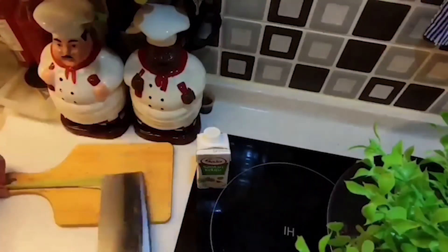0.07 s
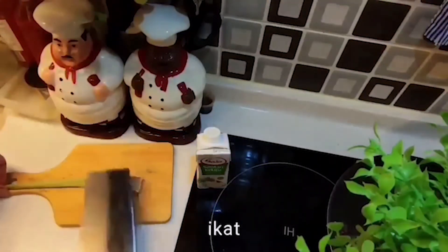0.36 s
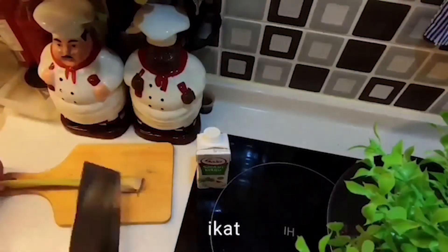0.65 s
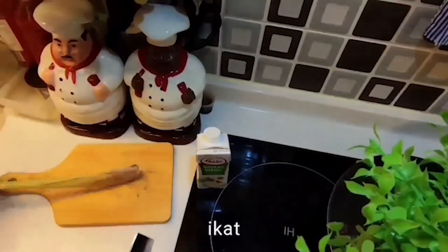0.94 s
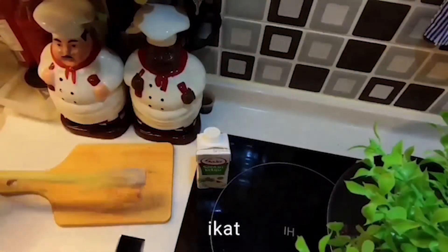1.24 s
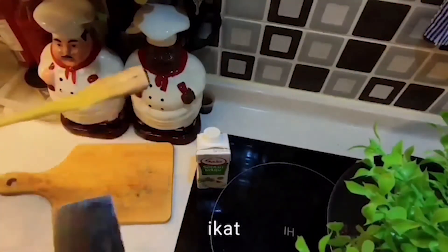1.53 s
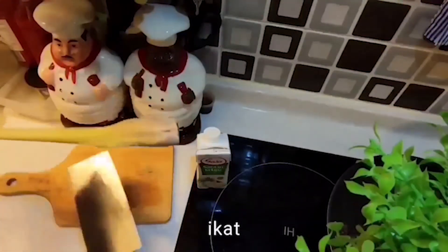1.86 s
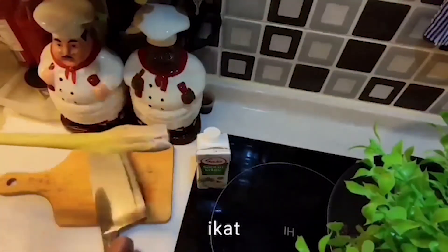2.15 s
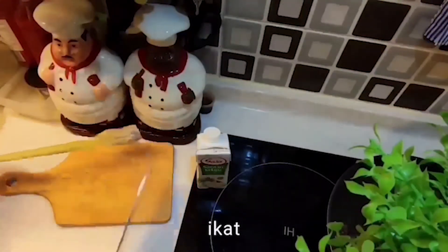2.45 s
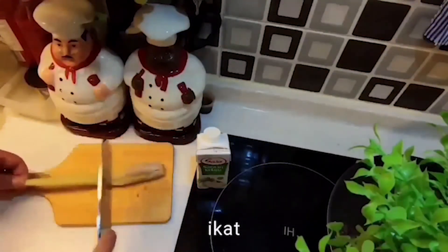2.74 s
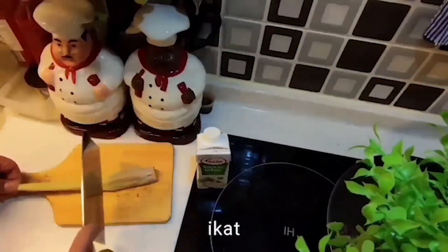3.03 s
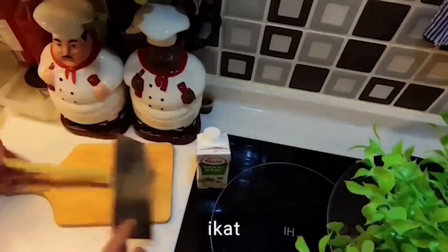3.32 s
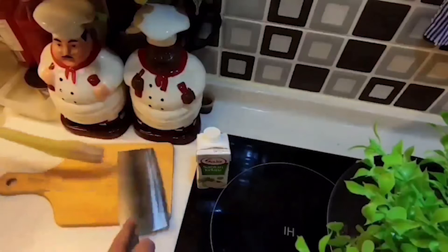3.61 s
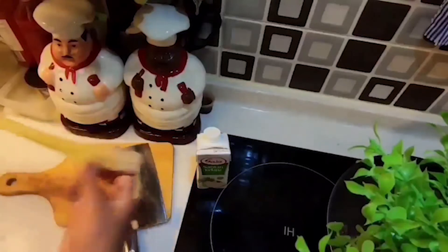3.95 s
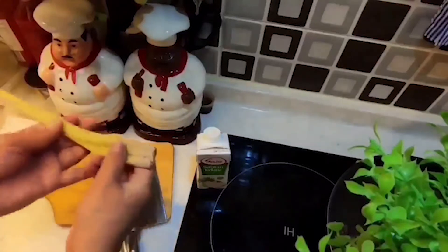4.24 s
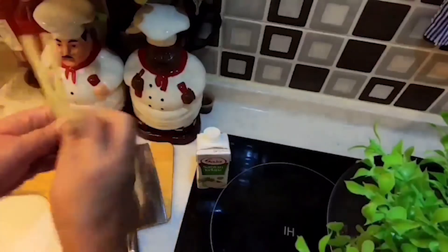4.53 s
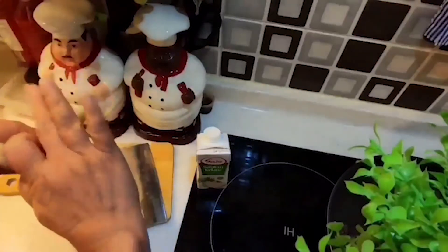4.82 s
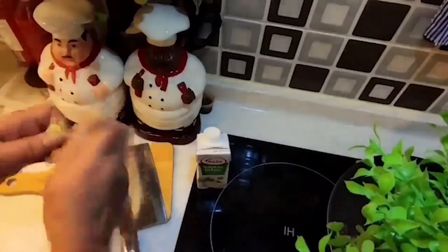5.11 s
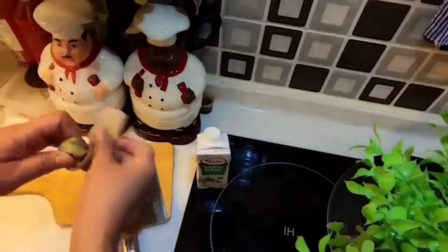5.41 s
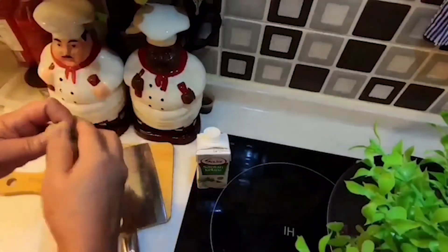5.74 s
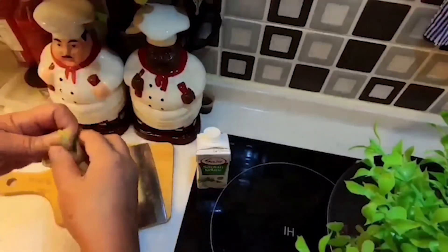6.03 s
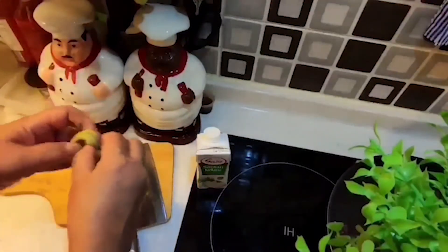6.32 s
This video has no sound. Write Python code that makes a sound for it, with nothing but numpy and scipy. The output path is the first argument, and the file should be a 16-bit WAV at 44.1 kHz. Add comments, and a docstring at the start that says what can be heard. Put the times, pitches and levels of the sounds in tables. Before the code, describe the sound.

In the first second, the flat of a cleaver smashes a lemongrass stalk four times, about a quarter second apart. Each blow is a crunch of bursting fibres with a steel clack and a thump of the wooden board. At 1.3 seconds the cleaver knocks loudly on the counter. Light taps and scrapes of the blade come around 2.5, 3.2 and 3.8 seconds, with some faint rubbing of fingers. At about 4 seconds the cleaver clatters down on the board, its steel ringing briefly as it rocks to rest. From then until about 6.6 seconds, fingers quietly rub and fold the stalk close to the microphone, and its fibres give small, scattered snaps. The knocks have a short, small kitchen echo. Moving air and an appliance motor hum faintly throughout, rising a little near 6 seconds.

```python
"""A small kitchen, where the flat of a cleaver smashes a lemongrass stalk again and again on a board.
Each blow bursts the fibres, thumps the wood and makes the counter boom. The cleaver then knocks on the
counter, is turned over and clatters down on the board, its steel ringing. Fingers rub and fold the stalk,
which crackles as its fibres snap. Moving air and an appliance motor hum faintly underneath."""
import sys
import numpy as np
from scipy import signal
from scipy.fft import rfft, irfft
from scipy.io import wavfile
from scipy.ndimage import uniform_filter1d, minimum_filter1d

SR = 44100
rng = np.random.default_rng(int(sys.argv[2]) if len(sys.argv) > 2 else 0)


def unload_wav(signal):
    """Save mono or channel-first audio to the path in sys.argv[1] as 16-bit WAV at rate SR, clipped to [-1, 1]."""
    wavfile.write(
        sys.argv[1],
        SR,
        np.round(np.clip(np.atleast_2d(signal).T, -1, 1) * 32767).astype(np.int16),
    )


N = 289737
T = np.arange(SR * 45 // 100) / SR  # time within one short sound, in seconds

# tone of breaking fibres: pitch_hz, level_db
CRUNCH_TONE = [(60, -25), (250, -20.5), (700, -3.5), (980, -3), (1250, -4.5), (1600, -5), (2200, -3.5),
               (3000, -5.5), (4000, -8.5), (6500, -10), (9000, -9), (13000, -11), (16000, -12.5)]
# notes of counter, board and cleaver, named in the lists of contacts and scrapes:
# pitch_hz, level_db, ring_s (time to fade by 60 dB)
COUNTER = [(51, -29.5, 0.47), (73.4, 5, 0.24), (101, 19.5, 0.088), (153.5, 15.5, 0.097), (208.8, -7, 0.45)]
BOARD_RIM = [(256, 14, 0.033), (324, 18, 0.047), (625, -19, .03)]
BOARD_SLAPPED = [(454, 1, 0.074), (516, -3.5, 0.066), (604, 2, 0.087), (763, -5, 0.08), (837, -7, 0.14),
                 (929, -4, 0.095), (970, -9, 0.1)]  # under the whole flat of the blade
BOARD_FREE = [(459, -1, 0.11), (497, 1, 0.1), (1590, -4.5, 0.022), (2030, -19, .02)]  # with nothing pressing on it
HANDLE_DOWN = [(199, 2, 0.08), (223, -4.5, 0.14), (327.4, -7, 0.12), (443, -1.5, 0.11), (566, -2, 0.081),
               (599.5, 1, 0.16), (694, -3, 0.051), (773, 2, 0.13), (998, -6.5, 0.1), (1640, -2, .03),
               (2094, -3.5, 0.023), (2440, 7.5, 0.019)]
BLADE_PING = [(3054, 0, .24), (3066, -12, .26), (8560, -13, .14)]
BLADE_ON_EDGE = [(1285, 17, 0.022), (2024, 17, 0.032), (2760, 16, 0.036), (3530, -4, 0.12), (5080, 2, 0.13),
                 (6300, -5, 0.17), (8400, -8, 0.1), (9560, -6, .08), (11000, -21, .1), (12400, -13, .12),
                 (13280, -9, .1)]
BLADE_LOOSE = [(1540, -3, 0.14), (1701, 1, 0.14), (1860, 1, 0.09), (2020, 1, 0.08), (2200, 0, .07),
               (2428, -5, .14), (2589, 1, 0.14), (3483, 4, 0.1), (3620, 10, 0.09), (4400, -3, .08),
               (4980, -7, .18), (5459, -2, 0.2), (5794, -5, 0.22), (6223, -10, .15), (7058, -8, .13),
               (7407, -12, .14), (8349, -3, 0.12), (8631, 9, 0.085), (9956, -5, 0.2), (9981, -4, .08),
               (11780, -4, 0.06), (13420, -12, 0.1), (15200, -3, .04)]
BLADE_ROCKING = [(5463, 0, .26), (5480, -9, .2), (5792, -13, .25), (9958, -12, .2)]  # the steel sings on as it rocks to rest
BLADE_SLIDING = [(8200, 3, 0.033), (8560, 17, 0.034), (8550, -4, .04), (9470, 2, 0.24), (12350, -19, .04)]
BLADE_SKIDDING = [(7350, 16, 0.037), (7540, -8, 0.028)]
BLADE_HELD = [(1450, -4, .025), (2650, -6, .02), (6255, -13, 0.14), (7440, -16, 0.25), (8107, -4, 0.12),
              (8570, -10, .1), (9000, -7, .04), (9313, -10, .08), (9604, -1, 0.11), (12330, -15, .1),
              (13070, -13, .07)]


def gain_of(db):
    """Turns decibels into a multiplier."""
    return 10 ** (np.asarray(db) / 20)


def unit_level(x):
    """Scales a sound to an average power of 1."""
    return x / np.sqrt(np.mean(x ** 2) + 1e-20)


def at_level(x, db):
    """Gives a short sound the energy of 10 ms at this level."""
    return gain_of(db) * x / np.sqrt(np.sum(x ** 2) * 100 / SR + 1e-20)


def at_pitch(points, hz):
    """Looks up a value between the rows of a table of pitches."""
    pitches, values = np.transpose(points)
    return np.interp(np.log(hz + 1), np.log(pitches + 1), values)


def curve(points):
    """Joins (time_s, value) points with straight lines."""
    return np.interp(np.arange(N) / SR, *np.transpose(points))


def add(mix, start_s, sound):
    """Mixes a sound in; what lies outside the mix is dropped."""
    start = round(start_s * SR)
    sound = sound[..., max(-start, 0):]
    part = mix[..., max(start, 0):][..., :sound.shape[-1]]
    part += sound[..., :part.shape[-1]]


def convolve(x, response):
    """Lets every sample of x set off the response."""
    return signal.fftconvolve(x, response)[:len(x)]


def colour(x, tone, tilt=0, size=4096):
    """Filters a sound to a tone table, plus a tilt in dB per octave."""
    hz = abs(np.fft.fftfreq(size, 1 / SR))
    log_gain = np.log(gain_of(at_pitch(tone, hz) + tilt * np.log2(hz / 2000 + .1)))
    spectrum = np.exp(np.conj(signal.hilbert(log_gain)))  # nothing rings before its cause
    return convolve(x, np.fft.ifft(spectrum).real[:size // 2])


def stereo_noise(count):
    """White noise at two close microphones: alike in the bass, unrelated in the treble."""
    # how alike the two sides are: pitch_hz, likeness (0 to 1)
    likeness = [(30, 1), (100, 0.68), (220, 0.92), (450, 0.66), (900, 0), (1800, 0), (16000, 0.078)]
    left, other = rfft(rng.standard_normal((2, count)))
    same = np.clip(at_pitch(likeness, np.fft.rfftfreq(count, 1 / SR)), -1, 1)
    right = same * left + np.sqrt(1 - same ** 2) * other
    return irfft(np.array([left, right]), count)


def crackle(peak_s, spread_db=-1.5):
    """A cluster of tiny, uneven clicks that swells to a peak and stops."""
    grains = rng.standard_normal(len(T)) * gain_of(spread_db * rng.standard_normal(len(T)))
    return grains * (T / peak_s) ** 2 * np.exp(-(T / peak_s) ** 2)


def ring(notes):
    """An object's own notes start together and fade, each at its own rate."""
    return sum(gain_of(db - 60 * T / ring_s) * np.sin(2 * np.pi * hz * T) for hz, db, ring_s in notes)


def strike(notes, db, contact_s):
    """The notes build up while the contact lasts, then ring out."""
    return at_level(ring(notes) * (1 - np.exp(-(T / contact_s) ** 2)), db)


def kitchen(x, room_db, near_ring_s=0.12, build_s=0.00098, lag_s=0.00015):
    """Direct sound and first echoes reach the left side first; scatter and the room's tail follow."""
    # echoes from counter, tiles and cupboards: delay_s, level_db
    echoes = [(.0064, -26), (.0086, -15), (0.0211, -10), (0.0242, -18)]
    # scatter from things nearby, and the room's tail: pitch_hz, level_db
    near_tone = [(80, 9.5), (450, -13.5), (1200, -4.5), (4000, 6), (9000, 3), (16000, -4.5)]
    tail_tone = [(80, -5.5), (450, -1.5), (1200, 0), (4000, -7.5), (9000, -11), (16000, -13)]
    # how long the tail lasts: pitch_hz, ring_s
    tail_times = [(80, 0.73), (450, 0.31), (2000, 0.36), (8000, 0.52), (16000, 0.38)]
    direct = np.zeros(len(T))
    direct[0] = 1
    for delay_s, db in echoes:
        add(direct, delay_s, gain_of([db + room_db]))
    hz, t, bands = signal.stft(stereo_noise(len(T)), SR, nperseg=256)
    hz = hz[:, None]
    fade = lambda ring_s: np.sqrt(np.log(1e6) / (ring_s * SR)) * gain_of(-60 * t / ring_s)
    near = gain_of(at_pitch(near_tone, hz)) * fade(near_ring_s)
    tail = gain_of(at_pitch(tail_tone, hz)) * fade(at_pitch(tail_times, hz))
    response = signal.istft(bands * (near + tail), SR, nperseg=256)[1][:, :len(T)]
    response *= (1 - np.exp(-T / build_s)) * gain_of(room_db)
    add(response[0], 0, direct)
    add(response[1], lag_s, direct)
    return np.array([convolve(x, side) for side in response])


def air_and_hum(air_db=-62, step_s=5.95, rise_s=0.084, step_db=6):
    """Moving air and a motor's slightly wavering hum; the background steps up near the end."""
    # the air's rush and the motor's notes: pitch_hz, level_db
    air_tone = [(15, -49), (25, -13), (55, -2), (114, -9.5), (130, -7), (185, 0.5), (217, -16.5),
                (394, -8.5), (560, -16.5), (936, -17), (1190, -28.5), (1400, -22.5), (1940, -30.5),
                (8590, -37.5), (16000, -38.5)]
    motor_notes = [(96.9, -78), (141.0, -67.5), (188.4, -75.5), (398.4, -80), (518, -79)]
    dip = [(7000, 0.0055), (8600, -6), (10800, 0.0029)]  # softer where the left microphone resonates
    air = np.array([colour(colour(side, air_tone), dip) for side in stereo_noise(N)])
    t = np.arange(N) / SR
    drifts = signal.resample(rng.standard_normal((len(motor_notes), 32)), N, axis=1)
    hum = sum(gain_of(db) * np.sqrt(2) * np.sin(2 * np.pi * hz * t + drift)
              for (hz, db), drift in zip(motor_notes, drifts))
    step_up = gain_of(curve([(step_s, 0), (step_s + rise_s, step_db)]))
    return (gain_of(air_db) * unit_level(air) + hum) * step_up


def finger_rubbing(catches_per_s=1500, slide=0.48, hold_db=-73.5, fold_db=-70, fold_from_s=4.1):
    """Skin slides over fibres: a steady hiss with tiny catches, swelling with each stroke."""
    # tone of the hiss: pitch_hz, level_db
    hiss_tone = [(300, -6.5), (1500, 2), (4000, 1), (7000, -0.5), (9000, -0.5), (12000, -2), (16000, -4.5)]
    # strokes along the stalk: start_s, length_s, level_db
    strokes = [(2.868, 0.38, -69.5), (3.825, 0.26, -64.5), (4.28, 0.12, -87), (4.85, 0.21, -69.5),
               (5.297, 0.28, -67.5), (5.426, 0.35, -65.5), (5.99, 0.24, -63), (6.226, 0.13, -65)]
    catches = (rng.random(N) < catches_per_s / SR) * gain_of(3 * np.minimum(rng.exponential(1, N), 4))
    hiss = np.array([colour(side * (slide + catches), hiss_tone) for side in stereo_noise(N)])
    power = gain_of(np.where(np.arange(N) / SR < fold_from_s, hold_db, fold_db)) ** 2
    for start_s, length_s, db in strokes:
        fastest_s = start_s + 0.038 * length_s
        power += gain_of(db) ** 2 * curve([(start_s, 0), (fastest_s, 1), (start_s + length_s, 0)])
    return unit_level(hiss) * np.sqrt(power)


def stalk_snaps(snaps_per_s=13, small_db=-70.5, spread_db=2):
    """Fibres snap one by one: a few loud ones, and small ones at random as the stalk bends."""
    # the loudest snaps: start_s, level_db
    loud_snaps = [(1.446, -61), (4.355, -63), (4.398, -61), (4.9525, -64), (5.054, -64.5), (5.0925, -60.5),
                  (5.6525, -65.5), (6.075, -63), (6.099, -60.5), (6.372, -65), (6.482, -64.5),
                  (6.551, -61.5)]
    # bends of the stalk: start_s, end_s (silent if the end comes first)
    bends = [(4.307, 4.6), (4.952, 5.2), (5.549, 5.79), (6.029, 4.2)]
    # tone of a snap: pitch_hz, level_db
    snap_tone = [(300, -14), (1500, -13), (4000, -11), (6500, -11), (8700, 0), (11000, -8), (16000, -13)]
    snaps, out = list(loud_snaps), np.zeros(N)
    for start_s, end_s in bends:
        for k, (place, size) in enumerate(rng.random((16, 2))):
            snap_s = start_s + (k + place) / snaps_per_s
            if snap_s < end_s:
                snaps.append((snap_s, small_db + spread_db * (2 * size - 1)))
    for snap_s, db in snaps:
        add(out, snap_s, at_level(colour(crackle(peak_s=0.0022), snap_tone), db))
    return out


def blade_scrapes(room_db=-2):
    """The blade scrapes over wood, and many tiny catches set it ringing."""
    # each scrape: start_s, level_db, peak_s, notes
    scrapes = [(0.601, -49, 0.0028, BLADE_SLIDING), (.614, -52, .008, BLADE_SKIDDING),
               (2.63, -54.5, 0.015, BLADE_HELD), (3.815, -59.5, 0.072, BLADE_SLIDING)]
    for start_s, db, peak_s, notes in scrapes:
        yield start_s, at_level(convolve(crackle(peak_s), ring(notes)), db), room_db


def cleaver_knocks(tick_gain=0.41, tick_s=0.0035, rise_s=0.00054, tilt_above_hz=615):
    """Steel and handle hit wood: a tick, then a short chatter. Hard knocks are bright, light ones thin."""
    # each knock: start_s, level_db, ring_s, lowest_hz, tilt_db_per_octave, room_db
    knocks = [(1.3, -27, 0.02, 153, -8, -1.5), (1.3004, -43.5, 0.03, 7500, 2.5, -1.5),
              (1.353, -34, 0.049, 239, -32, -12), (2.511, -45, 0.044, 85, -3, -4),
              (2.633, -56.5, 0.07, 139, 0, -10.5), (3.2267, -50, 0.02, 133, -4.5, -10),
              (3.827, -57, 0.011, 1310, -13.5, -2), (4.031, -26.5, 0.18, 570, -1.8, 0.5),
              (4.0315, -37, .05, 12900, 6, -13), (4.066, -41, 0.037, 1200, -1, -12),
              (4.135, -47.5, 0.04, 690, -3, -2), (4.2001, -48, 0.009, 88.5, -7.5, -16),
              (4.1995, -60, .005, 12000, 14, -18)]
    # tone of a knock: pitch_hz, level_db
    knock_tone = [(80, 4.5), (220, 2.5), (600, 4.5), (1300, -3), (3200, 0.5), (6000, -4), (9000, -8.5),
                  (14000, -10)]
    for start_s, db, ring_s, lowest_hz, tilt, room_db in knocks:
        fade = gain_of(-60 * T / ring_s) + tick_gain * np.exp(-T / tick_s)
        rise = 1 - np.exp(-T / rise_s)
        tone = [(hz, level + tilt * np.log2(max(hz / tilt_above_hz, 1))) for hz, level in knock_tone]
        chatter = colour(rng.standard_normal(len(T)) * fade * rise, tone)
        bass_cut = signal.butter(3, lowest_hz, "highpass", fs=SR, output="sos")
        yield start_s, at_level(signal.sosfilt(bass_cut, chatter), db), room_db


def cleaver_ringing():
    """Brief contacts ring the cleaver, board or counter; the notes depend on grip and landing spot."""
    # each contact: start_s, level_db, contact_s, room_db, notes
    contacts = [(1.3003, -22.5, 0.0038, -13, HANDLE_DOWN), (1.3005, -34.5, .002, -20, BLADE_PING),
                (2.5105, -45, 0.00085, -13, BLADE_ON_EDGE), (3.2268, -50, .001, -14, BOARD_RIM),
                (1.301, -45, .003, -6, COUNTER), (4.032, -29, .001, -6, BOARD_SLAPPED),
                (2.514, -55, .004, -4, COUNTER), (3.8276, -39, .00083, -13, BOARD_FREE),
                (3.845, -56, .008, -6, COUNTER), (4.031, -50, .002, -4, COUNTER),
                (4.032, -20.3, 0.003, -8, BLADE_LOOSE), (4.06, -35.7, .015, -12, BLADE_ROCKING)]
    for start_s, db, contact_s, room_db, notes in contacts:
        yield start_s, strike(notes, db, contact_s), room_db


def bundle_breaks(room_db=-7):
    """Thick bundles of fibres break under the blade, each in one sharp crack."""
    # each break: start_s, level_db, tilt_db_per_octave
    breaks = [(0.112, -38.5, -3), (0.3479, -26.5, -2), (0.366, -29, -1.5), (0.5892, -29, -4),
              (0.843, -41, -1.5), (0.8514, -36, -0.5)]
    for start_s, db, tilt in breaks:
        yield start_s, at_level(colour(crackle(peak_s=0.00074), CRUNCH_TONE, tilt), db), room_db


def stalk_tearing(db, crush_s, tilt, cracks_per_s=450, spread_db=5, crack_s=0.00062):
    """The crushed stalk tears in separate little cracks that fade away."""
    fade_s = 24 * crush_s
    cracks = rng.random(len(T)) < cracks_per_s / SR
    size_db = spread_db * np.minimum(rng.exponential(1, len(T)), 3)
    clicks = cracks * gain_of(size_db - 60 * T / fade_s)
    grit = rng.standard_normal(len(T)) * convolve(clicks, np.exp(-T / crack_s))
    return at_level(colour(grit, CRUNCH_TONE, tilt + 0.3), db)


def blade_clack(centre_hz, db, focus_db=10, width_octaves=.25):
    """The flat of the blade rings briefly; where it lands favours the notes near one pitch."""
    # the blade, muffled by the stalk: pitch_hz, level_db, ring_s
    blade_pressed = [(1710, 0, .06), (1880, -2, .05), (2040, 0, .06), (2250, -1, .045), (2550, -1, .05),
                     (2730, 1, .06), (3840, 3, .05), (4450, 1, .035), (4850, 1, .04), (5270, 3, .04),
                     (5950, 1, .035)]
    cut_db = lambda hz: focus_db * (1 - np.exp(-(np.log2(hz / centre_hz) / width_octaves) ** 2))
    notes = [(hz, level - cut_db(hz), ring_s) for hz, level, ring_s in blade_pressed]
    return strike(notes, db, contact_s=0.00046)


def fibre_burst(crush_s, count=60, low_hz=600, top_hz=15000, cycles=3.5, spread_db=6):
    """Fibres burst in a cluster: each gives a short tick of its own pitch and size."""
    t, out = T[:512], np.zeros(len(T))
    for k, (detune, size, a, b, c) in enumerate(rng.standard_normal((count, 5))):
        hz = low_hz * (top_hz / low_hz) ** ((k + np.tanh(detune) / 2) / count)
        tick = hz * np.sin(2 * np.pi * hz * t) * np.exp(-hz * t / cycles)
        start_s = .85 * crush_s * np.sqrt((a * a + b * b + c * c) / 2)  # most break late in the crush
        add(out, start_s, np.sign(a) * gain_of(spread_db * np.tanh(size)) * tick)
    return out


def smash(crunch_db, thump_db, boom_db, crush_s, tilt, echo_s, pulp_db=-5, echo_db=-6, give_s=0.00443):
    """The burst echoes off the wide blade; then the stalk gives way and drives board and counter."""
    # the board, pressed under the blade: pitch_hz, level_db, ring_s
    board_pressed = [(360, -4, .12), (415, 2, .07), (468, 13, .045), (512, 4, .05), (554, -1.5, .1),
                     (783, -2, .08), (870, -12, .07), (1012, -10, .08)]
    burst = unit_level(fibre_burst(crush_s))
    burst += gain_of(pulp_db) * unit_level(crackle(crush_s))  # hiss of the pulp
    burst += gain_of(echo_db) * np.roll(burst, round(echo_s * SR))
    sound = at_level(colour(burst, CRUNCH_TONE, tilt), crunch_db)
    thump = strike(board_pressed, thump_db, contact_s=0.0034)
    boom = strike(COUNTER, boom_db, contact_s=0.0061)
    add(sound, give_s, thump + boom)
    return sound


def cleaver_blows(clack_delay_s=0.0038, clack_room_db=-11, tear_room_db=-7):
    """Each blow smashes the stalk, clacks the blade and leaves the fibres tearing."""
    # the blows, the first already dying away: start_s, crunch_db, tear_db, thump_db, boom_db,
    # crush_s, tilt_db_per_octave, echo_s, clack_hz, clack_db, room_db
    blows = [(-.16, -10, -37.5, -6, -24, 0.0068, -0.25, 0.00095, 1960, -33, -15),
             (0.0866, -24.5, -25, -20, -33, 0.0065, -2.66, 0.00098, 2020, -28, -0.5),
             (0.343, -25.5, -39, -20, -39, 0.0052, -3.4, 0.001, 1830, -33.5, -2),
             (0.584, -29.5, -41, -21.5, -33, 0.0053, -1.2, 0.000838, 2350, -33, -3),
             (0.825, -26, -37, -21, -31.5, 0.0048, 0.88, 0.00076, 2660, -27.5, -4.5)]
    for (start_s, crunch_db, tear_db, thump_db, boom_db,
         crush_s, tilt, echo_s, clack_hz, clack_db, room_db) in blows:
        yield start_s, smash(crunch_db, thump_db, boom_db, crush_s, tilt, echo_s), room_db
        yield start_s + clack_delay_s, blade_clack(clack_hz, clack_db), clack_room_db
        yield start_s + 2 * crush_s, stalk_tearing(tear_db, crush_s, tilt), tear_room_db


def scene():
    """Blows, scrapes and snaps echo in the kitchen; the fingers are closest and have no echo."""
    sounds = [*cleaver_blows(), *bundle_breaks(), *cleaver_knocks(), *cleaver_ringing(), *blade_scrapes()]
    mix = air_and_hum() + finger_rubbing()
    for start_s, sound, room_db in sounds:
        add(mix, start_s, kitchen(sound, room_db))
    return mix + kitchen(stalk_snaps(), room_db=-8)


def record(dry, limit_db=-25, hold_s=.078, cut_share=0.6, top_hz=16250):
    """Two microphones colour the sound; a limiter turns loud blows down, holds, then lets go."""
    # tone of each microphone (the left one resonates): pitch_hz, level_db
    left_tone = [(100, .7), (450, 1.3), (1500, 0), (3500, -2.5), (6000, -3.5), (7400, 0), (8150, 10.5),
                 (8650, 12), (9300, 9), (10800, 3), (16000, 1)]
    right_tone = [(100, -.7), (450, -1), (1500, 0), (3500, 1.2), (6000, 1.5), (8500, -4), (11000, -2),
                  (16000, -2)]
    x = np.array([colour(dry[0], left_tone), colour(dry[1], right_tone)])
    power_db = 10 * np.log10(abs(uniform_filter1d((x ** 2).mean(0), size=200)) + 1e-12)
    hold = int(hold_s * SR)
    over_db = -minimum_filter1d(np.minimum(limit_db - power_db, 0), hold, origin=(hold - 1) // 2)
    release = np.arange(N) * 380 / SR
    over_db = np.maximum.accumulate(over_db + release) - release
    over_db = convolve(over_db, np.ones(500) / 500)  # acts late, so the start of a blow gets through
    x = x / gain_of(cut_share * over_db)
    treble_cut = signal.firwin(511, top_hz, window=("kaiser", 9), fs=SR)
    return signal.oaconvolve(x, treble_cut[None], "same")


dry = scene()
out = record(dry)
unload_wav(out)
```